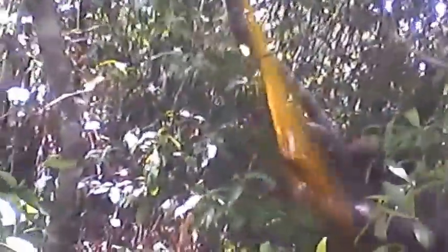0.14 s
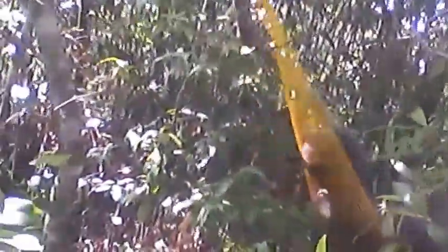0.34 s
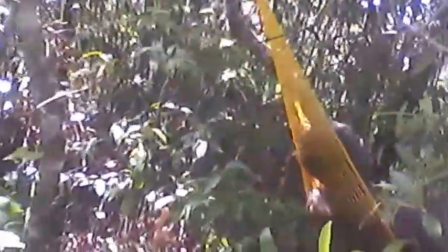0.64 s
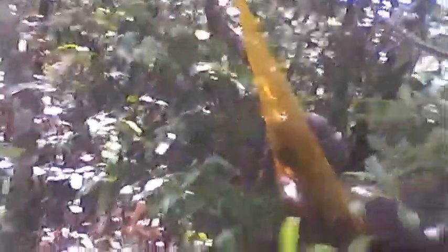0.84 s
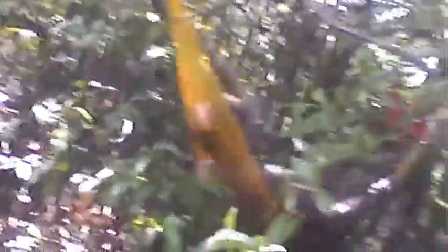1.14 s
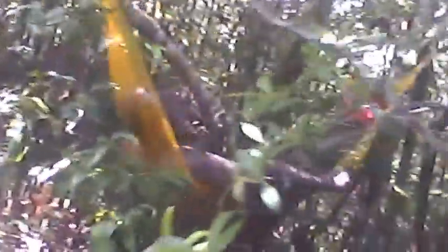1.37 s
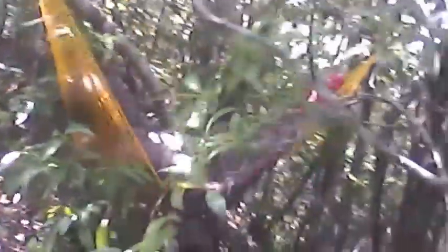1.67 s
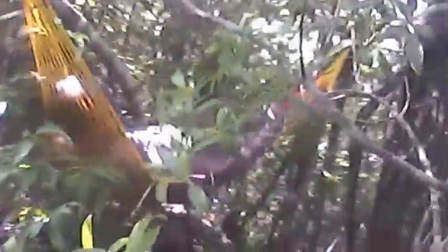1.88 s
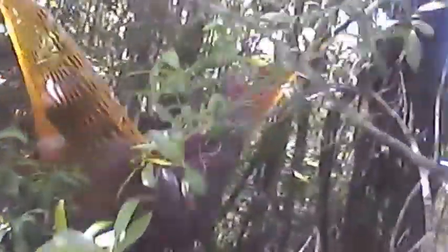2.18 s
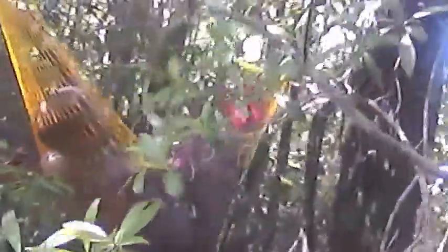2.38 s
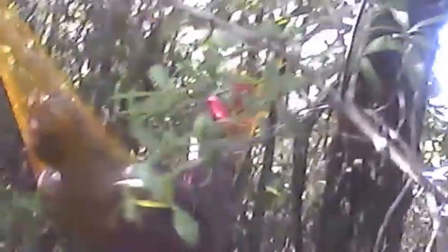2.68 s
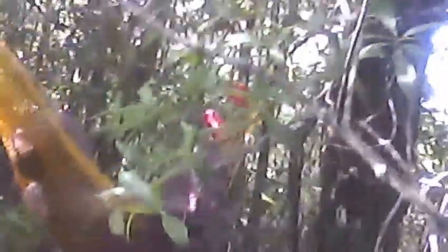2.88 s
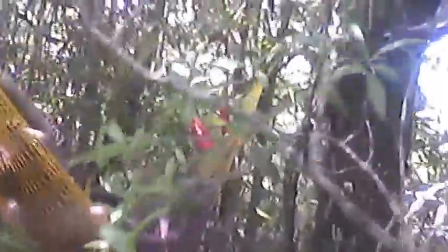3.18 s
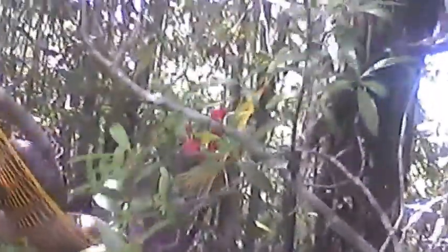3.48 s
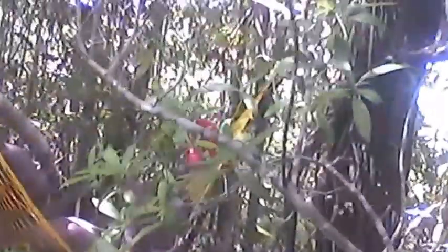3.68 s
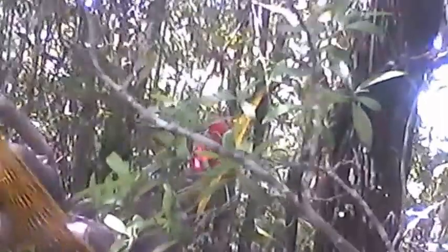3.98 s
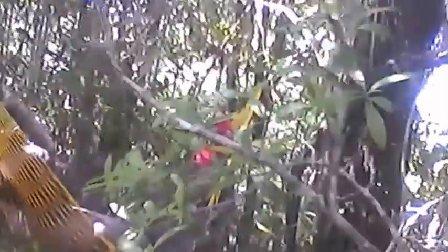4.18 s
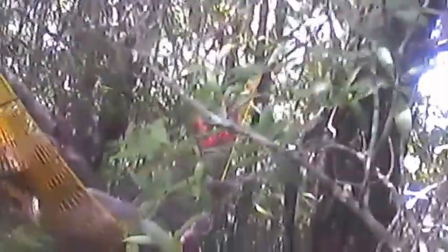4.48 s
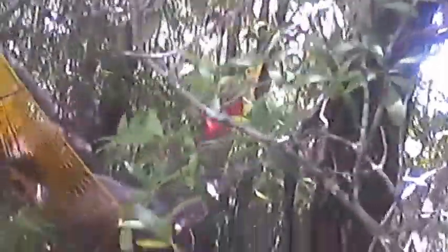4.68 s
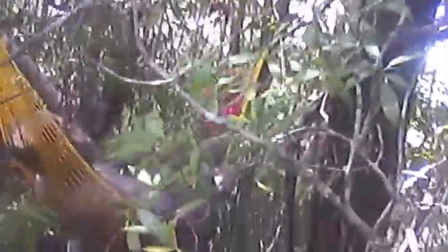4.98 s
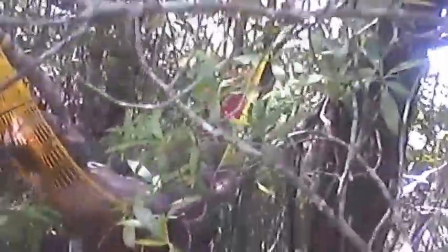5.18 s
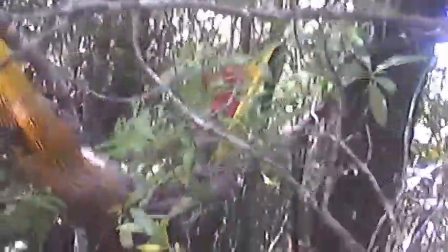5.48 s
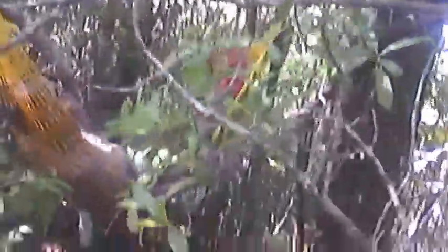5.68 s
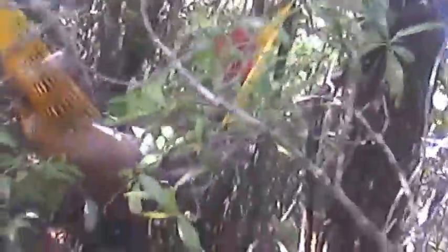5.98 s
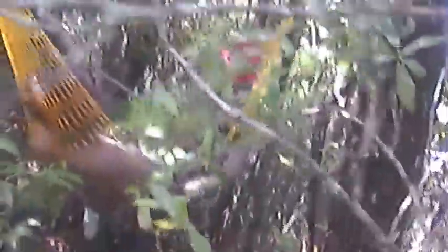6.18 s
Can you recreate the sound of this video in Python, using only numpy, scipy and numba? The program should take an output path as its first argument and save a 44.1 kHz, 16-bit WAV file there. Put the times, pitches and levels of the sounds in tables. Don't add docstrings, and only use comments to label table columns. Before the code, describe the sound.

Close, dry rustling of leaves and thin branches in a forest. It starts sparsely with faint ticks, then a snap and soft thumps near one second, followed by steady brushing and scattered twig clicks. A loud bright crack comes shortly before four seconds, and then denser snapping, leaf showers and dull camera knocks. A small cheap microphone gives a thin, brittle, band-limited sound with lightly garbled compression.

```python
import sys
import numpy as np
from scipy import signal
from scipy.fft import rfft, irfft
from scipy.io import wavfile
from scipy.ndimage import uniform_filter1d, minimum_filter1d
from numba import njit

SR = 44100
rng = np.random.default_rng(int(sys.argv[2]) if len(sys.argv) > 2 else 0)


def convert_level_to_amplitude(level_db):
    exponent = np.asarray(level_db, float) / 20
    return 10 ** exponent


def log_audio(samples):
    frames = np.atleast_2d(samples).T
    limited = np.clip(frames, -1, 1)
    pcm = np.round(limited * 32767).astype(np.int16)
    wavfile.write(sys.argv[1], SR, pcm)


N = 279594
TIME = np.arange(N) / SR
CAMERA_SR = 16000


@njit
def ring(x, hz, width):
    y, band, low = np.empty(len(x)), 0., 0.
    g, damping = np.tan(np.pi * hz / SR), width / hz
    for i in range(len(x)):
        v = (band + g * (x[i] - low)) / (1 + g * (g + damping))
        band, low = 2 * v - band, low + 2 * g * v
        y[i] = damping * v
    return y


def unit(x):
    return x / np.sqrt(np.mean(x ** 2))


def colour(x, table, size=8192):
    hz, db = np.transpose(table)
    bins_hz = np.arange(size // 2 + 1) * SR / size
    log_gain = np.interp(np.log(bins_hz + 1), np.log(hz), db) * np.log(10) / 20
    fold = irfft(log_gain)
    fold[1:size // 2] *= 2
    fold[size // 2 + 1:] = 0
    response = irfft(np.exp(rfft(fold)))
    return signal.fftconvolve(x, response)[:N]


def walk(rate):
    hold = int(SR / rate)
    steps = np.repeat(rng.standard_normal(N // hold + 1), hold)
    return unit(uniform_filter1d(uniform_filter1d(steps, hold), hold)[:N])


def crackle(rate, spread_db):
    hit = rng.random(N) < rate / SR
    size = np.minimum(rng.exponential(1, N), 6)
    return unit(hit * rng.standard_normal(N) * convert_level_to_amplitude(spread_db * size))


def add(out, t, piece):
    i = int(t * SR)
    out[i:i + len(piece)] += piece[:N - i]


def tilt(hz, middle_db, low_db):
    octave, place = np.log2(hz), np.log2([600, 1900, 3800])
    middle = np.interp(octave, place, [0, 1, 0])
    low = np.interp(octave, place, [1, 0, 0])
    return middle * middle_db + low * low_db


def wood(hz, thickness):
    # middle_db, low_db
    middle_gain = [-30, 0.5, 14.5]
    low_gain = [-12.5, -3, 22]
    knots = [0, .5, 1]
    return tilt(hz, np.interp(thickness, knots, middle_gain), np.interp(thickness, knots, low_gain))


def low_rumble():
    return convert_level_to_amplitude(-89) * unit(ring(rng.standard_normal(N), 134., 110.))


def grip():
    # time_s, creak_db
    tension = [(0, -94), (.4, -94), (.5, -88), (.6, -90.5), (1.1, -91), (2.3, -85.5), (2.6, -77.5),
               (3.45, -80), (3.7, -63.5), (4.05, -78.5), (4.451, -66), (5.0, -76), (5.2, -65), (5.6, -68.5),
               (5.8, -87), (6.34, -91.5)]
    # start_s, level_db (peak), pitch_hz, t60_s
    knocks = [(0.46, -72.5, 40.2, 0.22), (1.167, -39, 72.4, 0.12), (1.245, -43, 75, 0.078),
              (1.319, -52, 57.3, 0.12), (1.527, -59.5, 191, 0.043), (1.539, -67.5, 79, 0.12),
              (2.514, -69, 74.3, 0.21), (2.64, -67, 89.7, 0.25), (3.247, -61.5, 54.6, 0.15),
              (3.518, -63.5, 47.4, 0.26), (3.615, -53.5, 81.3, 0.21), (3.64, -48, 65.9, 0.096),
              (3.827, -60, 277, 0.13), (3.851, -56, 71, 0.15), (4.154, -39.5, 93.3, 0.059),
              (4.198, -49, 60.5, 0.084), (4.388, -54, 100, 0.053), (4.51, -57.5, 107, 0.17),
              (4.719, -39, 81.4, 0.06), (4.918, -45, 96.3, 0.075), (4.938, -43, 116, 0.051),
              (4.966, -40.5, 56, 0.054), (5.069, -51.5, 70.4, 0.085), (5.262, -47, 62.5, 0.17),
              (5.289, -42.5, 51.5, 0.051), (5.369, -60.5, 86.6, 0.087), (5.416, -49.5, 66, 0.08),
              (5.588, -48, 48.4, 0.051), (5.89, -48.5, 48, 0.034), (6.079, -58.5, 94, 0.12)]
    # frequency_hz, level_db (per Hz)
    creak_spectrum = [(11, -62), (18, -19), (43, 13), (70, 9.5), (217, -8), (261, -19), (329, -9.5),
                      (400, -19), (520, -73.5), (880, -120)]
    settle_db, settle_t60_s = -28, 0.62
    s, db = np.transpose(tension)
    creak, out = convert_level_to_amplitude(np.interp(TIME, s, db)), np.zeros(N)
    after = np.arange(int(.3 * SR)) / SR
    for t, db, hz, t60 in knocks:
        phase = 2 * np.pi * hz * (after + 0.0042 * (1 - np.exp(-after / 0.0092)))
        rise = (1 - np.exp(-after * hz * 5.8)) ** 2
        add(out, t, np.sin(phase) * rise * convert_level_to_amplitude(db + 7 - 60 * after / t60))
        add(creak, t, convert_level_to_amplitude(db + settle_db - 60 * after / settle_t60_s))
    rubbing = unit(colour(rng.standard_normal(N), creak_spectrum))
    return out + rubbing * uniform_filter1d(creak, size=1200) * convert_level_to_amplitude(4.5 * walk(18))


def loose_pieces():
    # start_s, level_db (peak), pitch_hz, t60_s
    singles = [(.249, -30.5, 4790, 0.13), (.298, -42, 4870, 0.073), (1.032, -47, 5220, 0.25),
               (1.1619, -33, 5740, 0.073), (1.531, -52, 242, 0.17), (1.532, -51, 600, 0.09),
               (1.719, -43, 2810, 0.12), (1.76, -61.5, 164, 0.18), (1.899, -62, 2080, 0.041),
               (1.946, -46, 957, 0.053), (2.437, -60, 393, 0.086), (2.5026, -30.5, 3770, 0.08),
               (3.432, -61.5, 1860, 0.061), (3.6391, -51.5, 2330, 0.11), (3.827, -33, 240, 0.034),
               (3.8272, -13.5, 5410, 0.24), (3.829, -29, 992, 0.042), (3.8332, -26, 3230, 0.15),
               (4.028, -52, 458, 0.073), (4.431, -51, 636, 0.052), (4.691, -31.5, 2010, 0.15),
               (4.696, -35.5, 900, 0.035), (4.705, -21.5, 5250, 0.18), (5.129, -38.5, 2160, 0.42),
               (5.1487, -23.5, 3770, 0.11), (5.35, -27, 1700, .07), (5.3583, -17, 3970, 0.09),
               (5.374, -34.5, 1647, 0.14), (5.7976, -37, 4130, 0.29), (6.1885, -41, 4720, 0.066)]
    # start_s, level_db (peak), pitch_hz
    brittle = [(0.3138, -31, 5170), (2.2035, -28, 5600), (3.2322, -23, 5000), (0.767, -47, 5000),
               (2.9525, -24.5, 5220), (3.8294, -8.5, 5150), (4.343, -46.5, 1480), (4.378, -41, 2670),
               (4.431, -42, 1320), (4.6975, -24, 4900), (4.7066, -17, 4890), (5.2179, -16, 4540),
               (5.352, -22.5, 4600), (5.3553, -12.5, 5280), (5.736, -21.5, 5060), (6.0763, -16.5, 4720),
               (6.0854, -18.5, 3590), (6.0854, -13.5, 5000), (6.229, -23.5, 4830)]
    # start_s, level_db (peak)
    shaken = [
        (1.55, -32.5),
        (3.13, -40),
        (3.199, -38),
        (3.841, -36),
        (4.711, -29),
        (5.155, -23.5),
        (5.359, -19.5),
    ]
    brittle_t60_s = 0.017
    shaken_hz, shaken_t60_s = 5250, 0.24
    rows = singles + [(*row, brittle_t60_s) for row in brittle]
    rows = rows + [(*row, shaken_hz, shaken_t60_s) for row in shaken]
    out, after = np.zeros(N), np.arange(int(.25 * SR)) / SR
    for t, db, hz, t60 in rows:
        scrape = rng.standard_normal(len(after)) * (1 - np.exp(-after / (.03 * t60)))
        blow = 8.0 * (t60 < .03) * (after == 0)
        push = (scrape + blow) * convert_level_to_amplitude(-60 * after / t60)
        width = 30 + hz / 4
        tone = ring(ring(push, 1. * hz, width), 1. * hz, width)
        add(out, t, tone * convert_level_to_amplitude(db - 4) / np.max(np.abs(tone)))
    return out


def pushing(hz):
    # start_s, length_s, level_db, thickness (0 leaf - 1 bough)
    pushes = [(0, 0.41, -62.5, 0.2), (1.578, 0.027, -52, 0.18), (1.731, 0.59, -56, .5),
              (2.19, 0.19, -46.5, 0.58), (2.419, 0.35, -41, 0.58), (2.799, 0.36, -48, 0.62),
              (3.062, 0.11, -43, 0.35), (3.274, 0.12, -54, 0.69), (3.697, 0.11, -65.5, 0.81),
              (3.902, 0.06, -38.5, 0.51), (4.014, 0.12, -42.5, 0.44), (4.212, 0.25, -42.5, 0.44),
              (4.496, 0.11, -53, 0.57), (4.699, 0.11, -40.5, 0.48), (4.903, 0.25, -46, 0.56),
              (5.141, 0.13, -40, 0.42), (5.345, 0.13, -44, 0.51), (5.53, 0.095, -53, 0.63),
              (5.624, 0.035, -47, 0.23), (5.732, 0.19, -46.5, 0.48), (6.166, 0.027, -49.5, 0.42)]
    rise_db_s, fall_db_s = 162, 96.5
    t = np.arange(0, N / SR, .005)
    start, length, db, thickness = np.transpose(pushes)[:, :, None]
    db = db + wood(hz, thickness)
    db = db - rise_db_s * np.maximum(start - t, 0) - fall_db_s * np.maximum(t - start - length, 0)
    still = convert_level_to_amplitude(-63.5 + tilt(hz, middle_db=0, low_db=9.5))
    return np.interp(TIME, t, np.sqrt(np.sum(convert_level_to_amplitude(db) ** 2, axis=0) + still ** 2))


def twig_snaps():
    # start_s, level_db (peak), thickness (0-1)
    snaps = [(.3135, -38, .1), (.3935, -45, 0), (2.193, -28.5, 0.46), (2.7915, -26.5, 0.34),
             (4.9565, -33, 0.4), (6.165, -41, .4), (.772, -39, 0.5), (1.1603, -22, 0.47), (1.5349, -53, .9),
             (2.2039, -17, 0.8), (2.9524, -26, 0.65), (3.229, -19, 0.5), (3.435, -48, .6),
             (3.8294, -15, 0.97), (4.3426, -30, 1), (4.3763, -34, 0.84), (4.432, -24.5, 0.7),
             (4.6925, -16, 0.78), (5.22, -16, 1), (5.2495, -17, 0.67), (5.3492, -13.5, 0.88),
             (5.7369, -20, .65), (6.0773, -17, 0.78), (6.0839, -10, 0.6), (6.2307, -25, 0)]
    break_s = .0011
    burst = rng.standard_normal((len(snaps), 400))
    burst = burst / np.std(burst[:, :100], axis=1, keepdims=True)
    return snaps, burst * np.exp(-np.arange(400) / SR / break_s)


def leaf_showers():
    # start_s, level_db (peak), thickness (0-1), t60_s
    showers = [(0.168, -42.5, .15, 0.077), (0.22, -33.5, .45, 0.051), (.392, -43, .1, 0.19),
               (1.5327, -33.5, 0.5, .5), (1.5738, -35.5, 0.68, 0.2), (1.6, -33.5, 0.5, 0.17),
               (1.698, -34.5, 0.4, 0.32), (1.716, -34.5, .2, 0.18), (1.881, -41, 0.2, 0.097),
               (1.932, -41.5, 0.93, 0.36), (1.991, -40.5, 0.4, 0.094), (2.18, -36.5, 0.3, 0.24),
               (2.7899, -31, 0, 0.24), (3.229, -21, 0.32, 0.083), (3.3132, -30.5, 0.56, .1),
               (3.8287, -17.5, 0.89, 0.18), (3.8345, -13, 0.43, 0.14), (4.3421, -35.5, 1, 0.13),
               (4.433, -39.5, 0.91, .36), (4.6932, -14, 0.21, 0.14), (4.9577, -21.5, 0.4, 0.36),
               (5.1479, -21.5, 0.53, 0.23), (5.2498, -28, 0.69, 0.23), (5.3492, -11, 0.91, .04),
               (5.3765, -29, .05, .31), (5.6172, -33, 0.3, 0.3), (5.7366, -23.5, 0.36, 0.11),
               (5.7792, -25, 0.21, 0.17), (6.163, -31, .4, .25)]
    rise_s = 0.0013
    after = np.arange(int(.4 * SR)) / SR
    bits, unevenness = rng.standard_normal((2, len(showers), len(after)))
    ticks = convert_level_to_amplitude(2.5 * uniform_filter1d(unevenness, size=64, axis=1) * 7.2 + 0.5)
    t60 = np.array(showers)[:, -1:]
    return showers, bits * ticks * (1 - np.exp(-after / rise_s)) * convert_level_to_amplitude(-60 * after / t60)


def stiff_leaves(flicks, stirring, hz):
    out = np.zeros(N)
    pitches = hz * 2 ** rng.uniform(-1 / 6, 1 / 6, 4)
    for sharp_hz, shift in zip(pitches, rng.integers(N, size=4)):
        flicked = np.roll(flicks, shift) * stirring
        out += ring(flicked, sharp_hz, 25 + sharp_hz / 45) * convert_level_to_amplitude(-1.5)
    return out


def undergrowth():
    # frequency_hz, level_db (per Hz)
    capsule = [(88, -72), (150, -23.5), (295, -33.5), (427, -25.5), (470, -24), (725, -23), (984, -19),
               (1380, -16), (2100, -15), (4680, -3), (5240, 0), (6160, -2), (7000, -7.5), (9100, -28),
               (15400, -120)]
    brush, flicks = crackle(900, spread_db=-1.0), crackle(110, spread_db=1.6)
    swell, out = walk(14), np.zeros(N)
    snaps, bursts = twig_snaps()
    showers, falls = leaf_showers()
    rows, pieces = snaps + showers, list(bursts) + list(falls)
    for hz in 250 * 2 ** np.arange(0, 5.1, 1 / 3):
        own = .5 * rng.standard_normal(N) + .45 * crackle(1500, spread_db=2.6) + .55 * brush
        stirring = pushing(hz) * convert_level_to_amplitude(1.3 * swell + 1.5 * walk(30))
        drive = own * stirring
        for (t, db, thickness, *_), piece in zip(rows, pieces):
            own_db = 1.5 * rng.standard_normal()
            add(drive, t, piece * convert_level_to_amplitude(db - 6.0 + own_db + wood(hz, thickness)))
        out += stiff_leaves(flicks, stirring, hz)
        out += ring(ring(drive, hz, hz / 2.6), hz, hz / 2.6)
    reference = colour(rng.standard_normal(N), capsule)
    return colour(out, capsule) * convert_level_to_amplitude(-2.0) / np.std(reference)


def scene():
    leaves = undergrowth()
    leaves = convert_level_to_amplitude(-1.5) * (leaves + .25 * ring(leaves, 5250., 700.))
    return np.tile(leaves + loose_pieces() + grip() + low_rumble(), (2, 1))


def starve(x):
    # start_s, coarser_step_db
    starved = [
        (1.085, 14),
        (3.04, 11),
        (5.85, 8),
    ]
    short = [.055, .17, .33, .415, .93, 2.08, 2.3, 2.59, 2.71, 2.9, 3.28, 3.36, 3.75, 3.945, 4.065, 4.41,
             4.47, 4.733, 4.797, 4.875, 5.02, 5.5, 5.8, 6.25, 6.31]
    hop, lead = 512, 48
    slow = np.pad(signal.resample_poly(x, 160, 441), (lead, 2 * hop))
    n, k = np.arange(2 * hop)[:, None], np.arange(hop)
    window = np.sin(np.pi * (n + .5) / (2 * hop))
    basis = window * np.cos(np.pi / hop * (n + .5 + hop / 2) * (k + .5))
    frames = np.lib.stride_tricks.sliding_window_view(np.pad(slow, (hop, 0)), 2 * hop)[::hop]
    lines = frames @ basis
    count, line_hz = len(lines), k * CAMERA_SR / (2 * hop)
    step_db, short_db = 4.0 + 1.1 * rng.standard_normal(count), np.zeros(count)
    for t, extra_db in starved + [(s, 5.5) for s in short]:
        short_db[int(round((t * CAMERA_SR + lead) / hop))] += 2 + extra_db
    local = np.sqrt(uniform_filter1d(lines ** 2, size=21, axis=1) + 1e-18)
    local = np.minimum(local, 1.6 * minimum_filter1d(local, size=3, axis=0))
    whole = np.sqrt(np.mean(lines ** 2, axis=1, keepdims=True) + 1e-18)
    follow = .9
    spared_db = np.interp(line_hz, [130, 450, 3500, 4300], [-11, 0, 0, -3])
    spared_db = spared_db + np.repeat(1.2 * rng.standard_normal((count, hop // 16)), 16, axis=1)
    spared_db = spared_db + short_db[:, None] * np.interp(line_hz, [1000, 3400, 4400], [1.15, .85, .4])
    step = convert_level_to_amplitude(step_db[:, None] + spared_db) * local ** follow * whole ** (1 - follow)
    frames = (np.round(lines / step) * step) @ basis.T * 2 / hop
    joined = (frames[1:, :hop] + frames[:-1, hop:]).ravel()
    return signal.resample_poly(joined[lead:], 441, 160)[:N]


def top_cut(x):
    return signal.sosfilt(signal.butter(12, 15600, fs=SR, output="sos"), x)


def record(dry):
    x = starve(dry[0])
    x = signal.sosfilt(signal.butter(N=14, Wn=6700, fs=SR, output="sos"), x)
    mirror = x * np.cos(2 * np.pi * CAMERA_SR * TIME)
    mirror_band = signal.butter(N=5, Wn=[9700, 13000], btype="band", fs=SR, output="sos")
    mirror = signal.sosfilt(mirror_band, mirror)
    hiss = convert_level_to_amplitude(-101) * rng.standard_normal(N) + convert_level_to_amplitude(-108) * rng.standard_normal((2, N))
    return top_cut(x + convert_level_to_amplitude(-51.5) * mirror + hiss)


dry = scene()
out = record(dry)
log_audio(out)
```